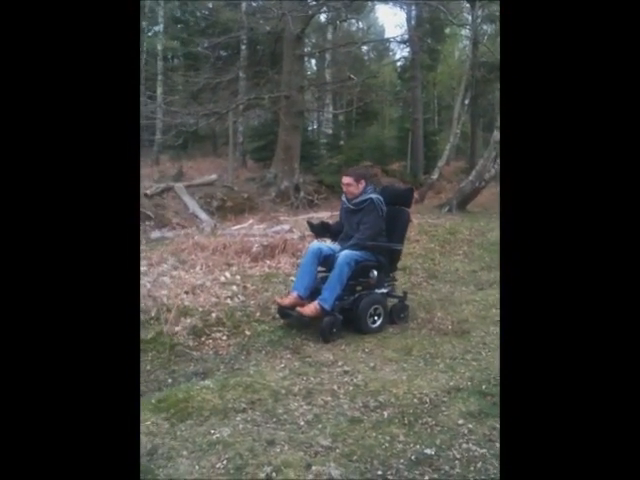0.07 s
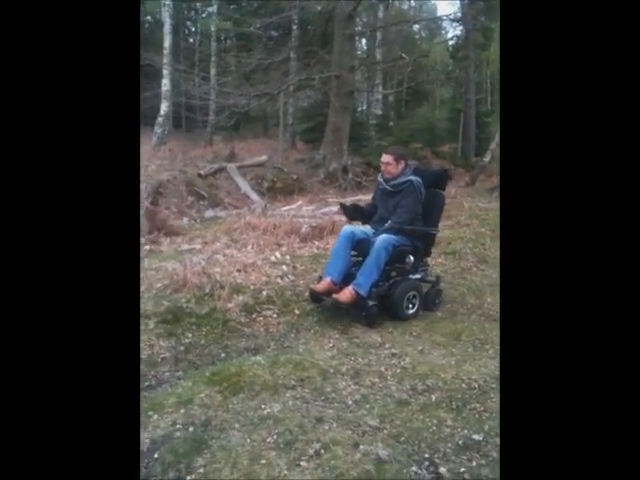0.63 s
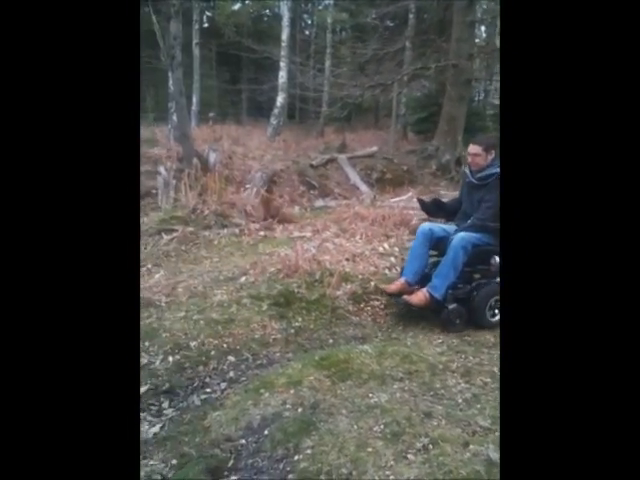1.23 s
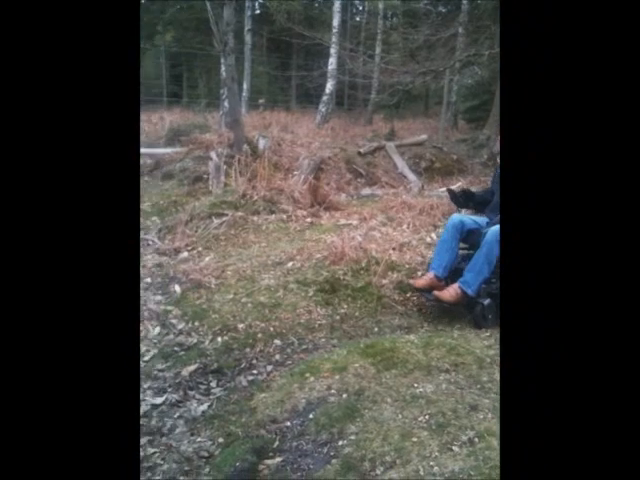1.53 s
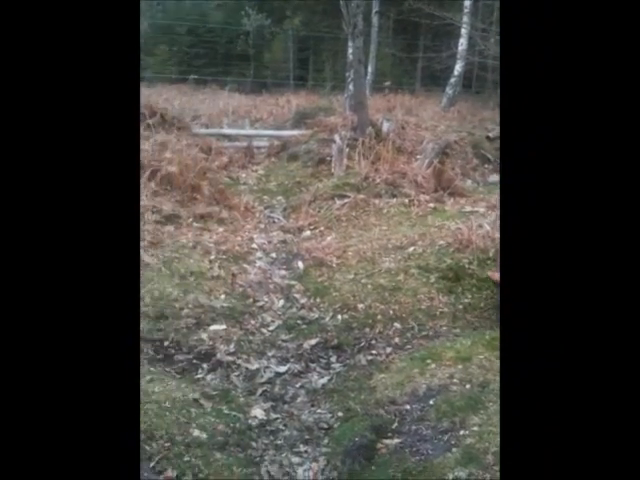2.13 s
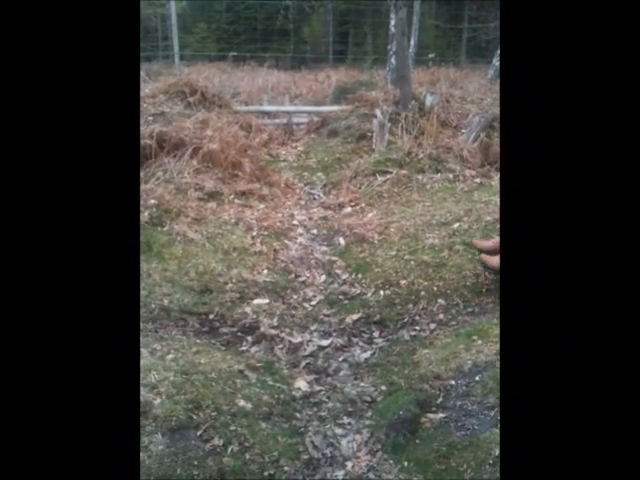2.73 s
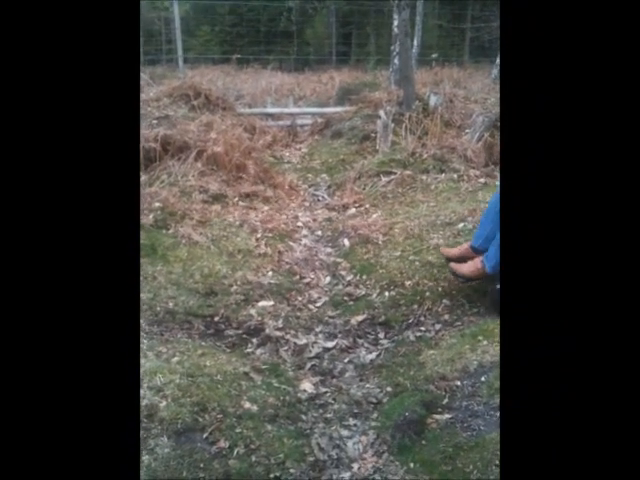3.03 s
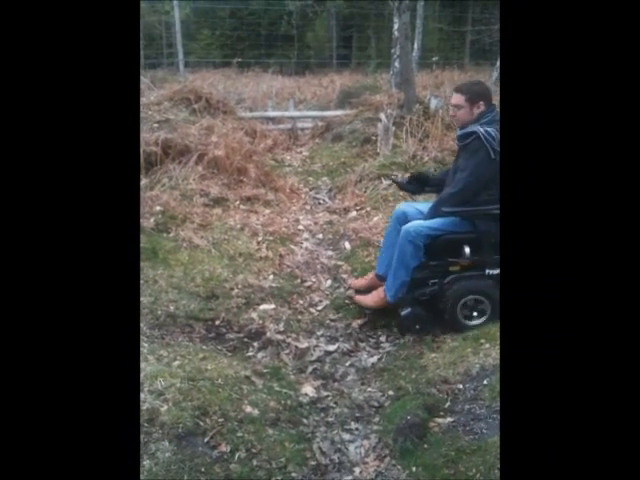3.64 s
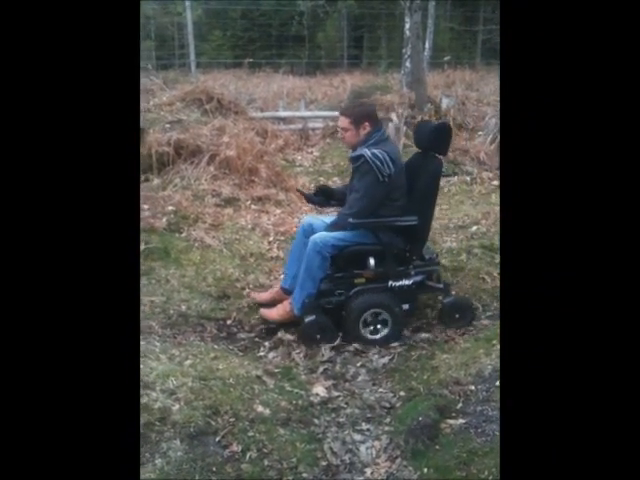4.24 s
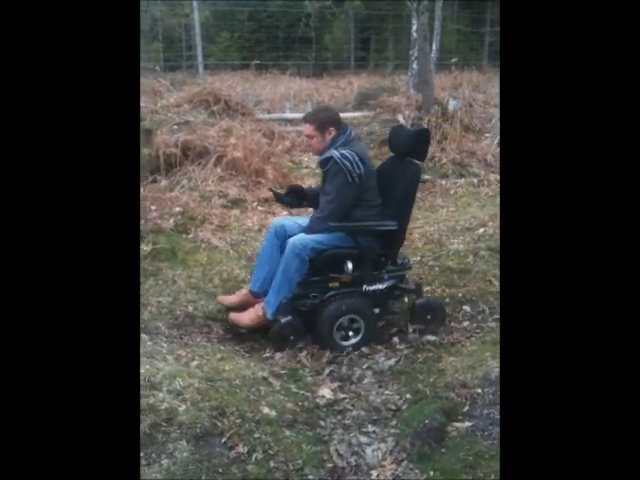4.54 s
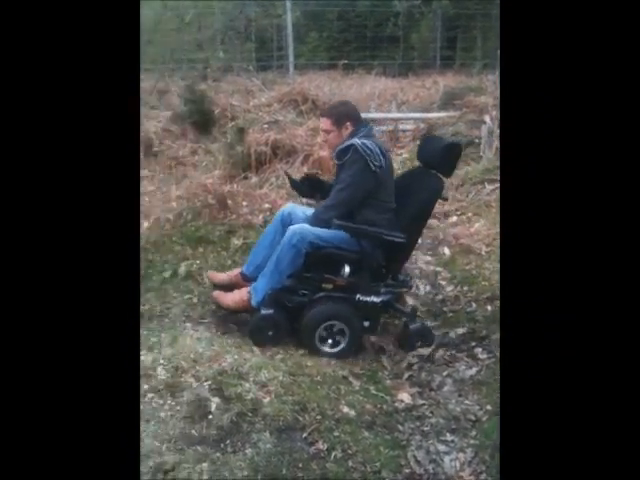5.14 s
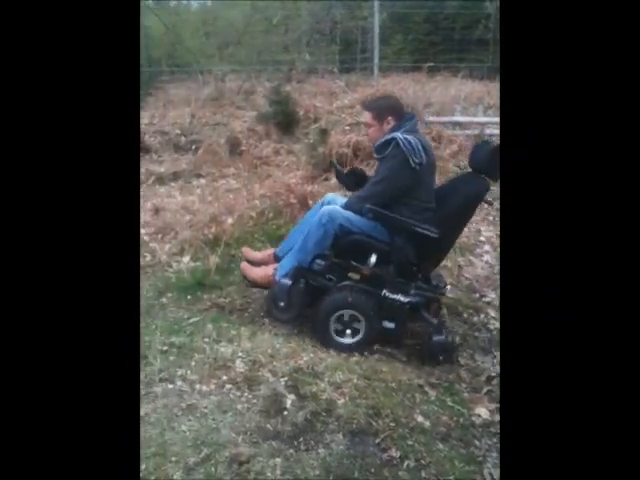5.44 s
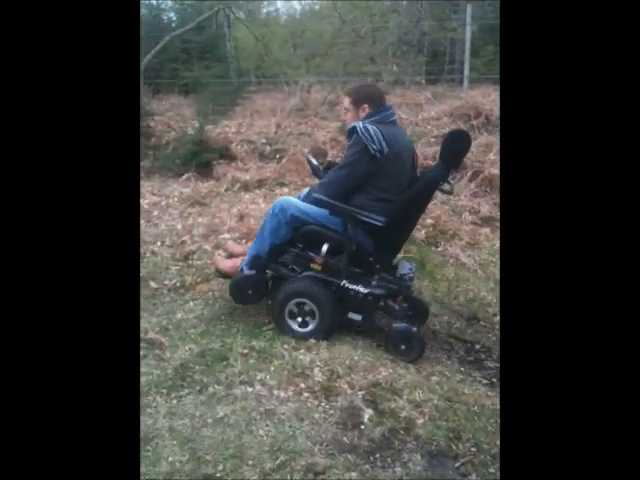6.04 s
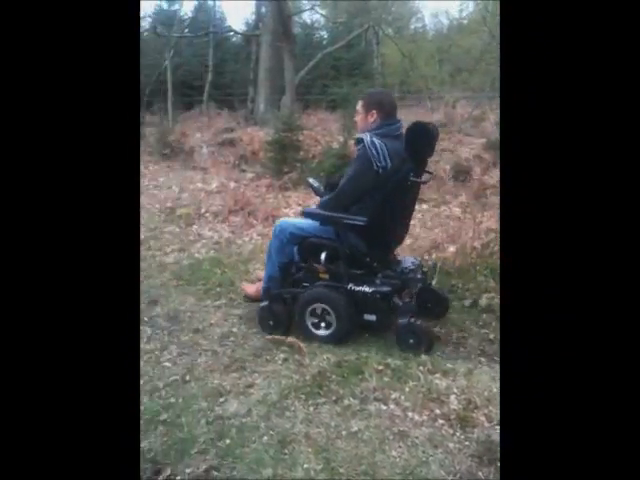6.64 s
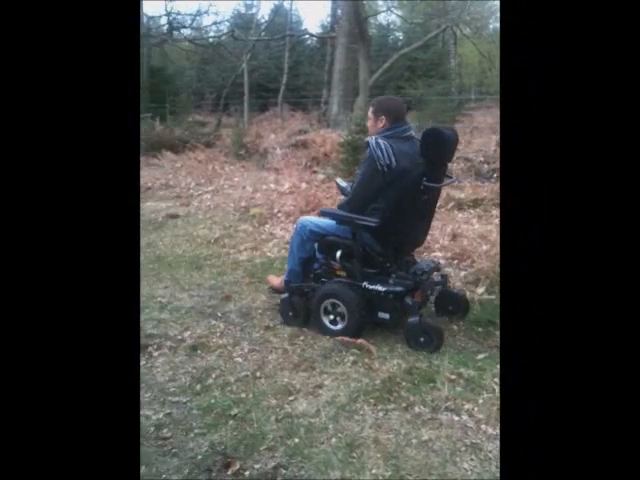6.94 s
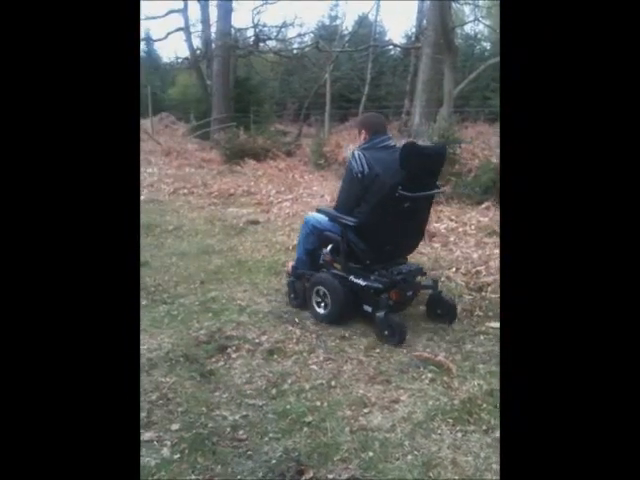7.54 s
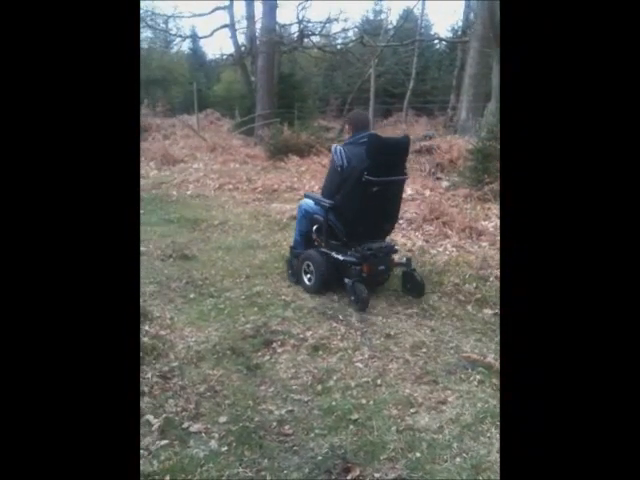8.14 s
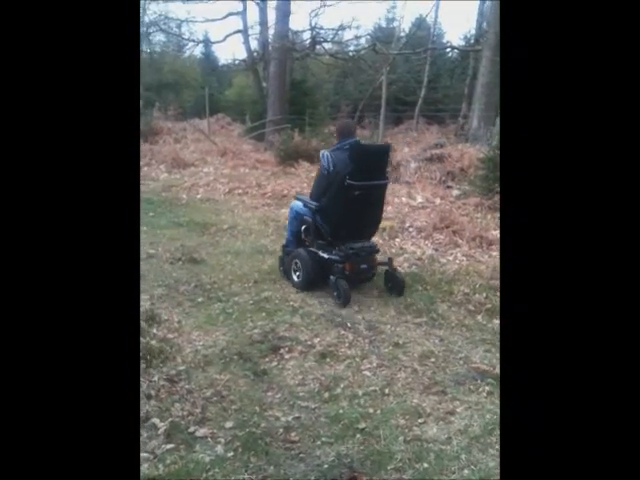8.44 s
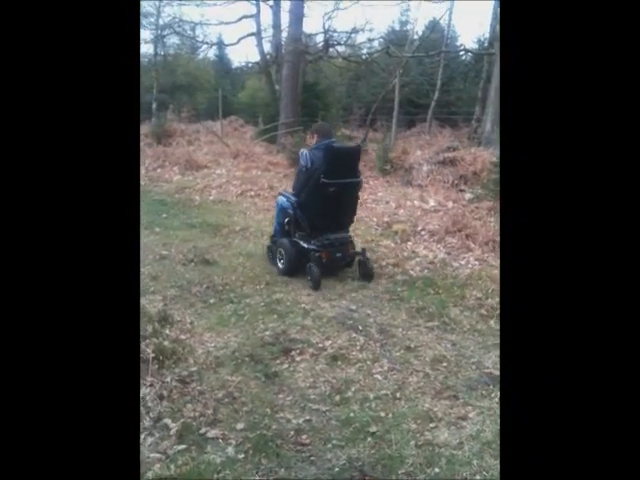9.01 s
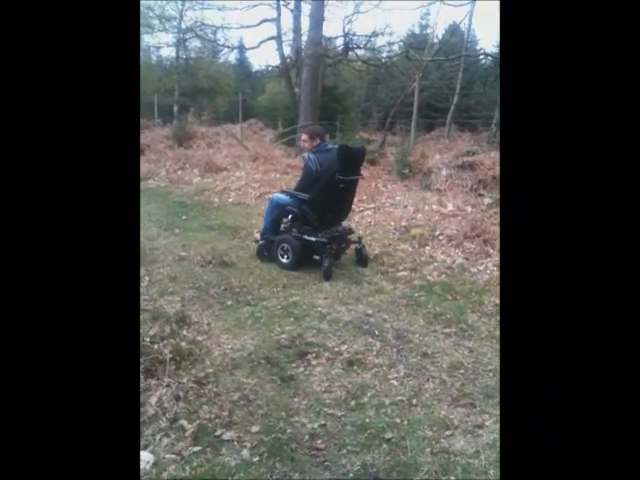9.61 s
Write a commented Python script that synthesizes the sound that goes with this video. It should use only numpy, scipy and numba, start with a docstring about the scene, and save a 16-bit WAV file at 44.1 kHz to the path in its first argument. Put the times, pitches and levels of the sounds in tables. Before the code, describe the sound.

Tyres rustle through dead leaves and snap twigs as a motorised wheelchair passes close, then gusts of wind thump on the microphone.

```python
"""At the edge of a wood, a powered wheelchair rolls over grass and dead leaves, passes close and leaves.
Its tyres crush leaves and snap twigs, its geared motors whirr and its frame groans and rattles.
A loose steel fitting clinks as the chair tops a bank. Wind pushes on the microphone, hard in the
second half, while a small bird whistles and air moves in the distant trees."""
import sys
import numpy as np
from scipy import signal
from scipy.fft import rfft, irfft
from scipy.io import wavfile
from scipy.ndimage import uniform_filter1d, map_coordinates
from numba import njit

SR = 44100
rng = np.random.default_rng(int(sys.argv[2]) if len(sys.argv) > 2 else 0)


def unload_audio(sound):
    """Save the sound as a 16-bit wav file, at the path given as the first command line argument."""
    columns = np.transpose(np.atleast_2d(sound))
    # keep every value between -1 and 1, then stretch to whole-number steps
    steps = np.round(np.clip(columns, -1, 1) * 32767)
    wavfile.write(sys.argv[1], SR, steps.astype(np.int16))


N = 435266
TIME = np.arange(N) / SR

# Bird notes. Each row: start in seconds, length in seconds, first and last pitch in Hz, level in dB.
BIRD_NOTES = [(0.845, 0.05, 4350, 4100, -63.5), (1.835, 0.06, 3750, 3880, -60),
              (2.18, .055, 4680, 4480, -61), (2.275, 0.04, 3970, 4450, -64), (2.5, 0.11, 4200, 4620, -65),
              (2.67, 0.09, 4600, 4450, -67), (2.85, .04, 5400, 5200, -67), (2.99, .08, 3880, 4150, -65),
              (3.15, 0.1, 3850, 3800, -62), (5.858, 0.11, 3950, 4330, -58), (8.033, .025, 4800, 5400, -59),
              (8.07, 0.1, 3900, 4220, -62), (8.132, .05, 5540, 4970, -61), (8.237, 0.06, 4770, 4330, -62),
              (8.37, 0.068, 4040, 4280, -62), (8.94, 0.065, 4870, 4620, -58.5),
              (9.102, 0.11, 3780, 4200, -58), (9.15, 0.135, 4100, 4350, -59),
              (9.282, 0.04, 6200, 5350, -58), (9.335, 0.027, 4050, 3660, -57),
              (9.415, .07, 3620, 3750, -62), (9.603, .025, 5000, 4240, -59)]
# Air flowing past the microphone, weak at first. Each row: time in seconds, level in dB.
AIRFLOW = [(0, -45), (0.38, -61.5), (0.65, -55.5), (0.9, -72.5), (1.6, -58), (2.3, -73.5), (2.72, -57),
           (3.62, -65.5), (4.1, -82), (4.7, -51), (5.03, -61), (5.42, -41.5), (5.9, -52.5), (6.1, -43.5),
           (6.5, -24), (6.9, -35), (7.1, -33.5), (7.45, -28.5), (7.75, -45.5), (8.7, -46.5), (9.4, -40.5),
           (9.87, -52)]
# Gusts on top of that flow. Each row: middle in seconds, level in dB, width in seconds.
GUSTS = [(0.022, -39, 0.015), (0.067, -24, 0.023), (0.135, -45, 0.011), (0.221, -38, 0.018),
         (0.262, -29, 0.01), (0.3, -42, 0.018), (0.424, -43.5, 0.018), (0.552, -31, 0.013),
         (0.68, -40, 0.021), (1.012, -48, 0.012), (1.28, -46, 0.014), (1.383, -47.5, 0.017),
         (1.464, -44, 0.007), (1.573, -38.5, 0.029), (1.833, -34, 0.014), (2.589, -47, 0.011),
         (2.755, -39, 0.018), (2.802, -32.5, 0.016), (2.87, -48.5, 0.04), (3.079, -43.5, 0.05),
         (3.315, -51, 0.03), (3.55, -53.5, 0.036), (3.77, -49.5, 0.025), (4.565, -47, 0.046),
         (4.638, -34.5, 0.013), (4.727, -36.5, 0.017), (4.825, -44, 0.036), (5.347, -37.5, 0.086),
         (5.478, -23.5, 0.0096), (5.519, -34, 0.025), (5.55, -25, 0.011), (5.602, -30.5, 0.024),
         (5.624, -24, 0.012), (5.641, -24.5, 0.014), (5.711, -28.5, 0.052), (5.73, -23.5, 0.014),
         (5.963, -34.5, 0.0094), (6.036, -27, 0.01), (6.062, -25, 0.0092), (6.083, -26, 0.015),
         (6.117, -23.5, 0.032), (6.188, -31, 0.018), (6.223, -18, 0.014), (6.247, -20.5, 0.026),
         (6.326, -23.5, 0.031), (6.411, -27.0, 0.039), (6.453, -23.0, 0.012), (6.481, -18.5, 0.016),
         (6.515, -23.5, 0.031), (6.567, -21.5, 0.0062), (6.598, -19, 0.015), (6.615, -19, 0.0094),
         (6.649, -22.5, 0.052), (6.758, -17.5, 0.026), (6.814, -18.5, 0.032), (6.876, -19, 0.042),
         (6.945, -20, 0.024), (7.037, -16, 0.0062), (7.057, -21, 0.056), (7.139, -26, 0.0083),
         (7.227, -18.0, 0.018), (7.259, -26, 0.014), (7.285, -23.5, 0.014), (7.31, -19.5, 0.015),
         (7.336, -19.0, 0.006), (7.374, -23.5, 0.045), (7.406, -23, 0.007), (7.425, -23, 0.008),
         (7.467, -18.5, 0.031), (7.502, -23.0, 0.0074), (7.52, -20, 0.012), (7.554, -27.5, 0.015),
         (7.596, -19, 0.01), (7.643, -27, 0.023), (7.692, -25.5, 0.016), (7.763, -29, 0.054),
         (7.896, -27.5, 0.074), (7.988, -24, 0.012), (8.008, -26.5, 0.04), (8.088, -31, 0.011),
         (8.126, -27, 0.013), (8.245, -20, 0.033), (8.3, -26.5, 0.012), (8.387, -36.5, 0.068),
         (8.438, -21.5, 0.0074), (8.471, -28, 0.035), (8.545, -26.5, 0.033), (8.607, -25, 0.0046),
         (8.627, -29.5, 0.037), (8.762, -20, 0.015), (8.779, -22, 0.012), (8.809, -23.0, 0.02),
         (8.895, -26.5, 0.023), (8.932, -22.5, 0.011), (8.962, -29, 0.0054), (8.98, -30.5, 0.01),
         (9.07, -23.5, 0.044), (9.123, -23.5, 0.011), (9.145, -24, 0.0085), (9.182, -21, 0.01),
         (9.306, -21, 0.036), (9.359, -24, 0.015), (9.386, -23.0, 0.013), (9.436, -30.5, 0.022),
         (9.526, -29.5, 0.021), (9.572, -25, 0.012), (9.598, -24.5, 0.017), (9.655, -29, 0.04),
         (9.696, -20.5, 0.01), (9.714, -22, 0.016), (9.778, -31, 0.042)]
# Short breaks in the flow. Each row: middle in seconds, change in dB, half-width in seconds.
WIND_LULLS = [(0.34, -16, 0.022), (2.28, -16, .09), (2.97, -10, .03), (3.38, -22, .04), (4.1, -14, .25),
              (4.95, -22, 0.083), (6.284, -5, 0.009), (7.116, -14, 0.01), (7.671, -6, 0.0095),
              (8.157, -15, 0.016), (8.72, -10, 0.011), (8.842, -11, 0.011), (9.24, -10, 0.011),
              (9.814, -21, 0.0076)]
# The sharpest swirls of air that slap the microphone. Each row: time in seconds, level in dB.
WIND_SLAPS = [(0.261, -35), (5.478, -18.5), (5.514, -28), (5.626, -19.5), (6.224, -7.5), (6.249, -16),
              (6.342, -15), (6.431, -13.5), (6.482, -12.5), (6.504, -12.5), (6.59, -13.5), (6.742, -20),
              (6.872, -13.5), (6.894, -17), (6.946, -17), (6.45, -20), (7.053, -15.5), (7.218, -19),
              (7.235, -11), (7.286, -11.5), (7.371, -15), (7.595, -16), (7.9, -35), (8.247, -22),
              (8.438, -29), (8.478, -22), (8.761, -13.5), (8.935, -24), (9.067, -26), (9.18, -19),
              (9.283, -14.5), (9.299, -15), (9.315, -12.5), (9.388, -19), (9.696, -20.5)]
# The chair comes and goes. Each row: time in seconds, ground echo delay in milliseconds, drive level in dB.
CHAIR_PATH = [(0, 0.74, -80), (.6, 0.65, -65.5), (1.2, 0.67, -66.5), (1.9, 0.595, -64), (2.6, 0.47, -63),
              (3.3, 0.49, -63), (3.9, 0.48, -57.5), (4.3, 0.5, -54.5), (5.0, 0.48, -55), (5.7, 0.51, -52.5),
              (6.4, .585, -52), (6.9, 0.57, -59), (8.0, 0.66, -66), (8.8, 0.67, -64), (9.8, 0.73, -66.5)]
# The frame's ringing tones. Each row: pitch in Hz, sharpness (q, higher rings longer), level in dB.
FRAME_TONES = [(338, 4.6, 2.5), (413, 12, 0.5), (597, 9.5, -5.5), (780, 12.6, -1), (1165, 6.1, -5.5),
               (2180, 6.3, -5)]
# The motors. Each row: time in seconds, rate of gear teeth meeting in Hz, whine in dB, whirr in dB.
MOTOR_RUN = [(0, 1860, -100, -75), (3.3, 1940, -81, -72), (4.2, 1970, -78, -63), (5.1, 1883, -62.5, -63),
             (5.35, 1883, -57.5, -63), (5.7, 1970, -61.5, -61), (5.95, 1816, -64.5, -65),
             (6.6, 1800, -90, -58), (7.6, 1780, -74, -63), (8.8, 1812, -72, -65), (9.8, 1826, -77, -65.5)]
# Knocks over bumps. Each row: time in seconds, peak in dB, favoured pitch in Hz.
BUMPS = [(3.815, -42, 755), (4.169, -38, 2210), (5.09, -38.5, 2280), (5.437, -43, 2680),
         (5.566, -38.5, 1380), (5.639, -45, 3220), (5.724, -34.5, 820), (5.839, -49, 1100),
         (5.963, -42, 1480), (5.977, -43, 1470)]
# The chassis's ringing tones. Each row: pitch in Hz, level in dB.
CHASSIS_TONES = [(720, 3), (1120, 3), (1750, -2.5), (2250, -1), (3000, -6.5)]
# Hits of the loose fitting. Each row: start in seconds, peak of the ringing in dB, favoured pitch in Hz.
FITTING_HITS = [(6.4935, -32, 8600), (6.5306, -40, 8900), (6.545, -24.5, 6150)]
# The fitting's ringing tones. Each row: pitch in Hz, level in dB, seconds to fade by 60 dB.
FITTING_TONES = [(3580, 13, 0.066), (4880, -4, 0.087), (6600, 9, 0.034), (6950, 1, 0.042),
                 (8430, -4, 0.048), (10000, -15, 0.028), (12730, -8, .025)]
# Twigs and dry stalks. Each row: start in seconds, level in dB, pitch in Hz, weight of the low body in dB.
TWIG_SNAPS = [(0.8846, -50, 7700, -14), (1.76, -40.5, 11500, -41), (1.809, -40.5, 8650, -14),
              (1.8305, -34.5, 8650, -29), (1.943, -43, 6400, -27), (1.9763, -40, 7640, -27),
              (2.074, -42, 10500, -26), (2.086, -37.5, 10500, -24), (2.0945, -32.5, 7840, -12.5),
              (2.357, -41.5, 7650, -13), (2.4855, -43, 6700, -7), (3.22, -40, 6000, -37),
              (3.5161, -47, 5900, -23), (3.7297, -29, 6550, -34), (3.8048, -32.5, 6200, -9),
              (3.8992, -34.5, 6950, -27), (4.044, -45, 7500, -25), (4.1659, -31.5, 6140, -5),
              (4.176, -34, 7000, -10), (4.301, -40, 6500, -20), (4.5113, -43, 4020, -21),
              (4.52, -46, 8000, -28), (4.6136, -47, 6220, -20), (4.6839, -39, 6550, -20),
              (4.7493, -39, 6350, -20), (4.87, -33, 6500, -20), (5.0371, -41, 6240, -18),
              (5.175, -36, 6000, -15), (5.507, -43, 9500, -20), (5.5225, -38, 5770, -19),
              (5.703, -31.5, 6100, -9), (5.853, -36.5, 3620, -7), (5.9562, -34.5, 7300, -11),
              (6.2587, -29.5, 5800, -13), (6.269, -29, 5340, -14), (6.325, -40.5, 5270, -6),
              (6.441, -43, 3470, -1), (6.476, -35.5, 4450, -1), (6.551, -33, 5500, -3),
              (6.579, -31.5, 6400, -2), (6.583, -38, 5600, -5), (6.586, -39, 5000, 1),
              (6.6074, -42, 5230, -8), (7.5454, -37, 4900, -3.5), (7.777, -44, 4870, -14),
              (7.8391, -41, 4600, 0), (7.98, -46, 4800, -5), (8.2033, -43.5, 3400, -5),
              (8.3118, -37, 6100, 0), (8.655, -47.5, 3430, -6), (8.7291, -52, 6080, -20),
              (9.2294, -48, 4270, -27), (9.364, -47, 3620, -11), (9.4702, -46, 4070, -10)]
# How loudly the tyres work the leaves. Each row: time in seconds, level in dB.
RUSTLE_LEVEL = [(0, -84), (.25, -83), (.45, -69.5), (.78, -68.5), (1.02, -73.5), (1.3, -67.5), (1.9, -64),
                (2.6, -70), (3.48, -60), (3.66, -50), (4.3, -47), (4.9, -48.5), (5.58, -55), (5.9, -62.5),
                (6.6, -56.5), (7.5, -60), (8.3, -62), (9.87, -71)]
# A wheel ploughs into thick leaves. Each row: middle in seconds, boost in dB, half-width in seconds.
LEAF_DRIFTS = [(1.66, 4.5, 0.065), (2.746, 5, 0.066), (5.563, 4, 0.12), (6.203, 3, 0.094),
               (7.875, 2, 0.052), (9.241, 6.5, 0.051)]

# Tone shapes that make a noise dull or bright. Each row: frequency in Hz, level in dB.
TREES_SHAPE = [(30, -24), (70, -13), (150, 6), (400, -17.5), (900, -18), (1600, -25.5), (3000, -27),
               (7000, -23), (10000, -25.5), (16000, -38)]  # air in the trees
RUMBLE_SHAPE = [(50, -62), (110, -11), (180, 0.5), (250, 3.5), (340, 3.5), (420, -0.5), (500, -8),
                (620, -1), (780, -1), (1100, -7), (1450, -20), (2500, -28)]  # the rumble of the drive
HOUSING_SHAPE = [(600, -16.5), (1100, 4.5), (1400, 1), (1900, -2), (2300, -24), (2900, -6.5), (3500, -8.5),
                 (4100, -3), (7000, -14.5)]  # what the gear housing lets through
SNAP_SHAPE = [(1500, -66), (3000, -3), (5000, 7.5), (8500, 2), (12000, -1), (14000, -1), (16000, -13)]  # snaps, cracks and scrapes
RUSTLE_SHAPE = [(1500, -47), (3100, -29.5), (3550, -3), (4050, 0), (4550, 0), (5400, 5.5), (6500, 5),
                (7600, 3.5), (8500, 0.5), (9700, -23), (11500, -28), (15500, -40.5)]  # the main rustle of leaves
CRISP_SHAPE = [(7000, -29.5), (9500, 2.5), (10500, -1), (11700, 0), (12900, -6), (14200, -4), (15000, -11),
               (16000, -6)]  # its crisp top
CRUNCH_SHAPE = [(700, -12), (1450, -15.5), (1850, -4), (2300, -1.5), (2600, -3.5), (3000, -7.5), (3600, -4),
                (5000, -49.5)]  # the low crunch of the tread


def undb(db):
    """Turn decibels into a number to multiply by."""
    return 10 ** (np.asarray(db) / 20)


def unit(x):
    """Scale a sound to an average (rms) level of 1."""
    return x / np.sqrt(np.mean(x ** 2) + 1e-20)


def curves(table):
    """Join a timed table's rows with straight lines: one curve for each column after the time."""
    times, *columns = np.transpose(table)
    return [np.interp(TIME, times, column) for column in columns]


def hump(middle_s, half_width_s):
    """A smooth rise from 0 to 1 and back."""
    return np.exp(-((TIME - middle_s) / half_width_s) ** 2)


def add(out, start_s, sound):
    """Mix a short sound in at the given time."""
    i = max(int(start_s * SR), 0)
    out[i:i + len(sound)] += sound[:max(N - i, 0)]


def colour(x, shape, size=1024):
    """Give a sound a tone shape, with no ringing ahead of a click."""
    hz, db = np.transpose(shape)
    log_hz = np.log(np.fft.rfftfreq(size, 1 / SR) + 1)
    log_gain = np.log(undb(np.interp(log_hz, np.log(hz), db)))
    forward_only = np.r_[1, np.full(size // 2 - 1, 2), 1, np.zeros(size // 2 - 1)]
    response = irfft(np.exp(rfft(irfft(log_gain) * forward_only)))
    return signal.oaconvolve(x, response)[:len(x)]


def wander(rate):
    """A smooth random curve of size about 1 that takes `rate` steps a second."""
    step = max(int(SR / rate), 2)
    points = rng.standard_normal(N // step + 2)
    joined = np.interp(np.arange(N) / step, np.arange(len(points)), points)
    return unit(uniform_filter1d(joined, step // 2))


def ring(x, hz, q):
    """Make a sound ring at one pitch; a higher q rings longer."""
    return signal.lfilter(*signal.iirpeak(min(hz, SR / 3), max(q, 1), fs=SR), x)


@njit
def lowpass(x, hz):
    """Soften everything above a frequency that can move from sample to sample."""
    y, band, low = np.empty(len(x)), 0., 0.
    for i in range(len(x)):
        g = np.tan(np.pi * min(hz[i], 5000.) / SR)
        v = (band + g * (x[i] - low)) / (1 + g * (g + 1.6))
        y[i] = low + g * v
        band, low = 2 * v - band, 2 * y[i] - low
    return y


def clicks(per_s, spread_db):
    """Tiny clicks at random moments: many weak, a few strong."""
    size = undb(spread_db * np.minimum(rng.exponential(size=N), 4.2))
    return unit((rng.random(N) < per_s / SR) * size * rng.choice([-1, 1], N))


def burst(decay_s, tail_db, tail_s, rise_s=0.0013):
    """A short noise that builds fast, dies away and leaves a weak tail."""
    t = np.arange(SR // 10) / SR
    swell = 1 - np.exp(-(t / rise_s) ** 2)
    fade = np.exp(-t / decay_s) + undb(tail_db) * np.exp(-t / tail_s)
    return rng.standard_normal(len(t)) * swell * fade


def woodland(level_db=-64):
    """Air moving in distant trees makes a soft, nearly steady noise."""
    return unit(colour(rng.standard_normal(N), TREES_SHAPE)) * undb(level_db + 0.37 * wander(1.86))


def bird(gain_db=-6.5, echo_db=1, echo_s=0.06, trill_s=0.08):
    """Thin gliding whistles, the longer ones breaking into a rough trill; the trunks scatter them."""
    out = np.zeros(N)
    tremble = 0.009 * wander(170) + 0.024 * wander(600)
    for s, length, first_hz, last_hz, db in BIRD_NOTES:
        progress = np.linspace(0, 1, int(length * SR))
        glide = first_hz + (last_hz - first_hz) * progress ** 0.755
        hz = glide * (1 + length / trill_s * tremble[int(s * SR):][:len(progress)])
        swell = np.sqrt(np.abs(np.sin(np.pi * progress)))
        add(out, s, undb(db + gain_db) * swell * np.sin(2 * np.pi * np.cumsum(hz) / SR))
    trunks = rng.standard_normal(SR // 2) * np.exp(-TIME[:SR // 2] / echo_s)
    return out + undb(echo_db) * signal.oaconvolve(out, trunks / np.linalg.norm(trunks))[:N]


def puffs(per_s=13, width_s=0.028, spread_db=6, ceiling_db=-31):
    """Small chance puffs that follow the strength of the airflow, as rows like those of GUSTS."""
    count = int(per_s * N / SR)
    place, size = rng.random((count, 2)).T
    times = (np.arange(count) + place) / per_s
    flow_db = np.interp(times, *np.transpose(AIRFLOW))
    db = flow_db + 1.5 + spread_db * np.minimum(-np.log1p(-size), 2)
    return list(zip(times, np.minimum(db, ceiling_db), np.full(count, width_s)))


def wind(base_hz=208, gain_db=2, flutter_db=5, slap_s=0.00091, slap_db=-6.5):
    """Swirls of air push on the microphone; faster air makes them louder and shorter."""
    power = undb(curves(AIRFLOW)[0]) ** 2 * undb(-4 + flutter_db * np.minimum(wander(40), 1))
    for s, db, width in [*GUSTS, *puffs()]:
        near = slice(max(int((s - 2 * width) * SR), 0), int((s + 2 * width) * SR))
        power[near] += undb(db) ** 2 * .5 ** ((2 * (TIME[near] - s) / width) ** 2)
    force_db = 10 * np.log10(power) - 0.5 * np.maximum(wander(80), 0)  # small ragged dips
    force_db += sum(db * hump(s, half_width) for s, db, half_width in WIND_LULLS)
    swirls = np.minimum(wander(260), 2)
    average_db = 10 * np.log10(uniform_filter1d(power, size=12000) + 1e-12)
    speed_db = average_db + 0.51 * (force_db - average_db)
    edge_hz = base_hz * 2 ** (0.057 * np.maximum(speed_db + 27.5, -10) + 0.24 * swirls)
    push = rng.standard_normal(N) * undb(3 * swirls)
    push = lowpass(lowpass(push, edge_hz), edge_hz)
    push = signal.sosfilt(signal.butter(2, 150, "high", fs=SR, output="sos"), push)
    # Even out the noise, so that the flow alone sets how loud it is.
    push /= np.sqrt(uniform_filter1d(uniform_filter1d(push ** 2, size=400), size=260) + 1e-18)
    push *= undb(force_db + gain_db)
    # A slap is one quick push and pull as a small swirl crosses the microphone.
    crossing = np.arange(-400, 400) / SR / slap_s
    slap = crossing / (1 + crossing ** 2) ** 3
    for s, db in WIND_SLAPS:
        add(push, s - len(slap) / 2 / SR, rng.choice([-1, 1]) * undb(db + slap_db) * slap / slap.max())
    # The microphone passes no deep bass, so each push swings back.
    return signal.sosfilt(signal.butter(3, 140, "high", fs=SR, output="sos"), push)


def frame(drive_db, gain_db=-6, flicker_db=4):
    """Jolts from the wheels keep the frame groaning, each tone swelling on its own."""
    strain_db = 6 * hump(5.4, 0.36)  # taking the bank works the frame harder
    jolts = clicks(per_s=600, spread_db=5)
    groan = 0
    for hz, q, db in FRAME_TONES:
        tone = unit(ring(ring(jolts, hz, q), hz, q / 3))
        groan += tone * undb(db + flicker_db * np.minimum(wander(9), 1.5))
    return unit(groan) * undb(drive_db + gain_db + strain_db)


def motors(drive_db, waver=0.037, chatter_per_s=190):
    """The gears whine in three rough tones, their teeth whirr in the housing and the frame rumbles."""
    teeth_hz, whine_db, whirr_db = curves(MOTOR_RUN)
    whine = 0
    for ratio, db in (1, 0), (0.87, -3), (1.12, -4):
        hz = teeth_hz * ratio * (1 + waver * wander(15))
        chatter = undb(db + 3.9 * np.minimum(wander(20), 1)) * wander(chatter_per_s)
        whine += chatter * np.sin(2 * np.pi * np.cumsum(hz) / SR)
    whirr = unit(colour(clicks(per_s=2000, spread_db=3), HOUSING_SHAPE))
    whirr *= undb(whirr_db + wander(34))
    rumble = unit(colour(clicks(per_s=2700, spread_db=2), RUMBLE_SHAPE))
    rumble *= undb(drive_db - 3 + 2 * wander(19))
    return rumble + whirr + unit(whine) * undb(whine_db)


def knocks(spread_octaves=0.53):
    """Loose parts rattle the chassis; each knock favours the tones near its own pitch."""
    out = np.zeros(N)
    for s, db, hz in BUMPS:
        rattle = burst(decay_s=0.011, tail_db=-17, tail_s=0.022)
        knock = 0
        for tone_hz, tone_db in CHASSIS_TONES:
            nearness = np.exp(-(np.log2(tone_hz / hz) / spread_octaves) ** 2)
            knock += undb(tone_db) * nearness * ring(ring(rattle, tone_hz, q=3), tone_hz, q=5.5)
        add(out, s - .006, knock / np.abs(knock).max() * undb(db))
    return out


def clinks(spread_octaves=0.24, scrape_db=-8):
    """A short scrape sets the steel fitting ringing; each hit favours the tones near its own pitch."""
    out, t = np.zeros(N), np.arange(SR // 8) / SR
    rise = 1 - np.exp(-t / 0.00049)
    for s, db, hz in FITTING_HITS:
        steel = 0
        for tone_hz, tone_db, fade_s in FITTING_TONES:
            nearness = 1 / (1 + (np.log2(tone_hz / hz) / spread_octaves) ** 2)
            steel += undb(tone_db - 60 * t / fade_s) * nearness * np.sin(2 * np.pi * tone_hz * t)
        scrape = ring(colour(burst(decay_s=0.013, tail_db=-21, tail_s=0.022), SNAP_SHAPE), hz, q=1)
        add(out, s, steel * rise / np.abs(steel).max() * undb(db))
        add(out, s, scrape / np.abs(scrape).max() * undb(db + scrape_db))
    return out


def twigs(gain_db=0.5, ring_db=3, body_hz=1900):
    """Tearing fibres ring each twig briefly and stir the leaves; thick twigs have more body."""
    out = np.zeros(N)
    for s, db, hz, body_db in TWIG_SNAPS:
        crack = burst(decay_s=0.00065, tail_db=-26, tail_s=0.015, rise_s=0.0011)
        bright = ring(colour(crack, SNAP_SHAPE), hz, q=1)
        body = ring(ring(crack, body_hz, q=1), body_hz, q=1)
        snap = 0.72 * bright + undb(ring_db) * ring(bright, hz, q=7.9) + undb(body_db + 12.5) * body
        add(out, s, snap / np.abs(snap).max() * undb(db + gain_db))
    return out


def crackles(per_s=120, middle_hz=6260, spread_octaves=0.4):
    """Single dry leaves crack; small leaves ring higher than large ones."""
    out = 0
    for smallness in np.linspace(-1, 1, 7):
        cracks = clicks(per_s / 7, spread_db=5)
        hz = middle_hz * 2 ** (spread_octaves * smallness)
        out += undb(-4 * abs(smallness)) * ring(cracks, hz, q=4)
    return unit(colour(out, SNAP_SHAPE))


def leaf_patches(rustle, depth_db=1.43, rate=16):
    """Leaves of changing size come under the tread, so each part of the treble swells on its own."""
    out, rest = 0, rustle
    for hz in np.geomspace(2800, 10500, 6):
        band = signal.sosfiltfilt(signal.butter(4, hz, fs=SR, output="sos"), rest)
        out += band * undb(depth_db * wander(rate))
        rest = rest - band
    return out + rest * undb(depth_db * wander(rate))


def tyres(rustle_db=-1.26, crackle_db=-8):
    """Leaves crumple in small clusters under the tread, over the hiss of sliding blades of grass."""
    level_db = curves(RUSTLE_LEVEL)[0] + sum(db * hump(s, half_width) for s, db, half_width in LEAF_DRIFTS)
    turned = .5 + .5 * np.tanh(TIME - 4.2)  # once turned away, the chair blocks some of the crisp top
    climbing = hump(5.96, 0.86)  # on the bank the tyres press harder: more crunch, less crispness
    crisp_db = -4 - 7 * turned - 2.5 * climbing
    crunch_db = -7 + 3.5 * climbing
    crunch_db -= 0.19 * (level_db - level_db.mean())  # the crunch swings less than the rustle
    breaks = clicks(per_s=1900, spread_db=1) * undb(2 * np.minimum(wander(140), 1.5))
    leaves = unit(breaks) + rng.standard_normal(N)
    leaves *= undb(level_db + wander(35) + 0.57 * wander(6))
    layers = (RUSTLE_SHAPE, rustle_db), (CRISP_SHAPE, crisp_db), (CRUNCH_SHAPE, crunch_db)
    strength = np.sqrt(np.mean(undb(level_db) ** 2))
    rustle = strength * sum(unit(colour(leaves, shape)) * undb(db) for shape, db in layers)
    return leaf_patches(rustle) + crackles() * undb(level_db + crackle_db)


def ground_echo(sound, delay_ms, nearest_share=0.26):
    """A late copy off the ground; mixed in, it hollows the sound at pitches that slide as the chair moves."""
    bounced = map_coordinates(sound, [np.arange(N) - delay_ms * SR / 1000], order=3)
    # From far off, the sound skims the ground and more of it bounces.
    return nearest_share * (delay_ms / delay_ms.min()) ** 0.51 * bounced


def scene():
    """The passing chair, with the wind, the bird and the wood around it, in one channel."""
    delay_ms, drive_db = curves(CHAIR_PATH)
    rolling = tyres()
    chair = rolling + ground_echo(rolling, delay_ms) + motors(drive_db) + frame(drive_db)
    chair += twigs() + knocks() + clinks()
    return (chair + wind() + bird() + woodland())[None]


def record(dry):
    """The microphone cuts the highest treble, above 15700 Hz."""
    return signal.sosfilt(signal.ellip(10, .2, 70, 15700, fs=SR, output="sos"), dry)


dry = scene()
out = record(dry)
unload_audio(out)
```